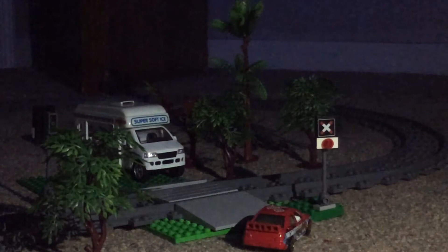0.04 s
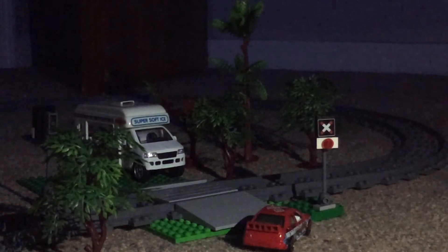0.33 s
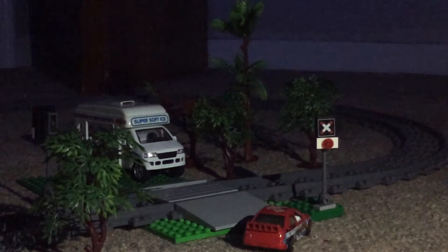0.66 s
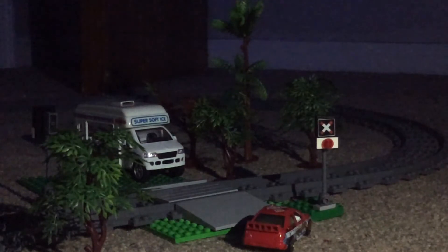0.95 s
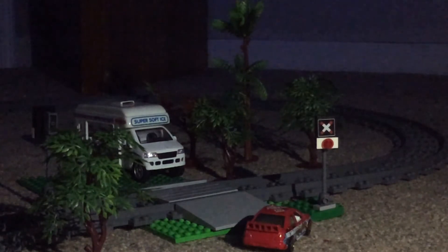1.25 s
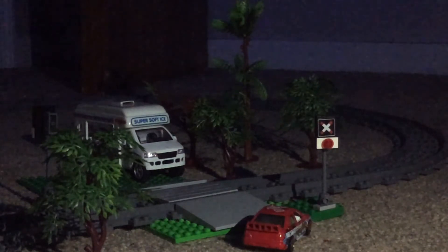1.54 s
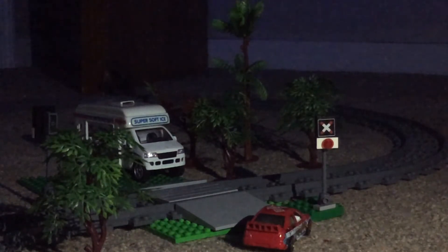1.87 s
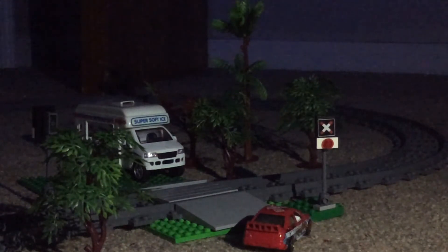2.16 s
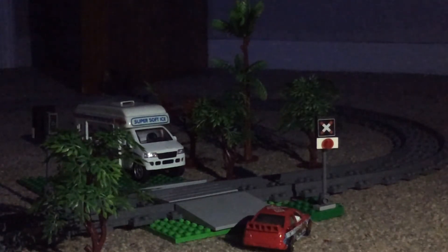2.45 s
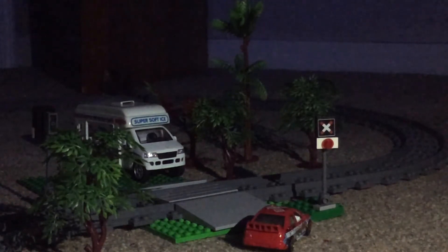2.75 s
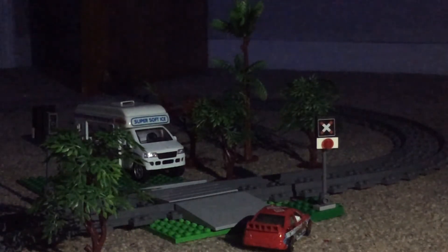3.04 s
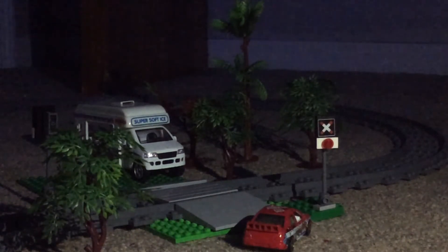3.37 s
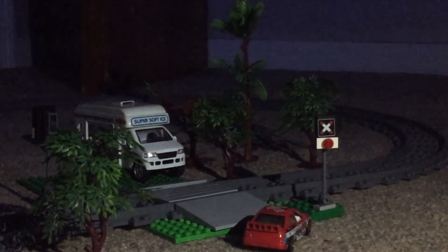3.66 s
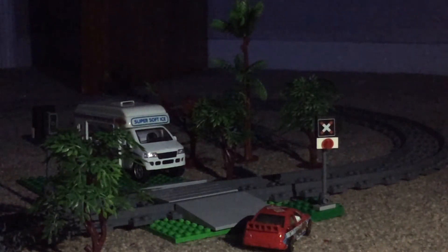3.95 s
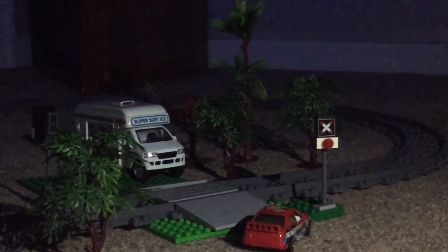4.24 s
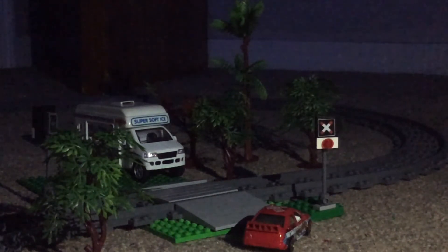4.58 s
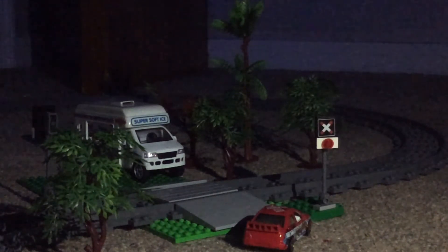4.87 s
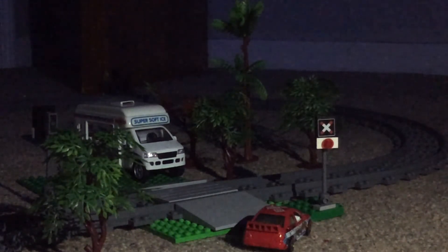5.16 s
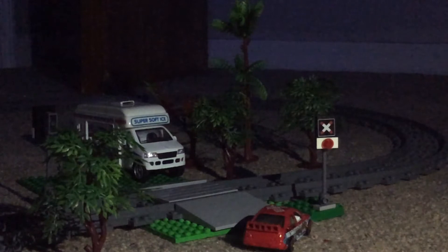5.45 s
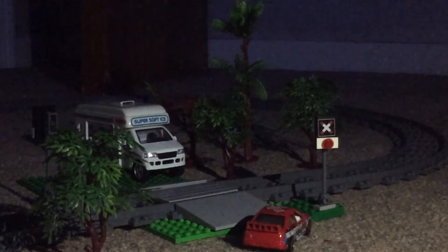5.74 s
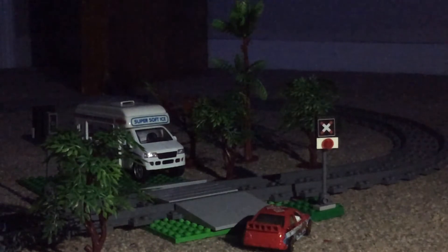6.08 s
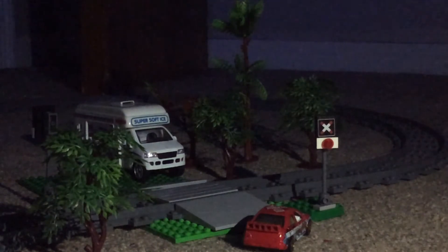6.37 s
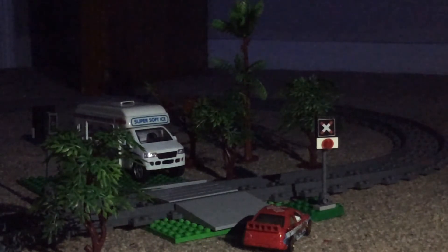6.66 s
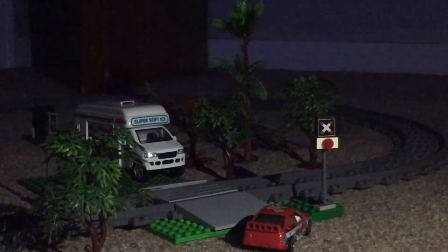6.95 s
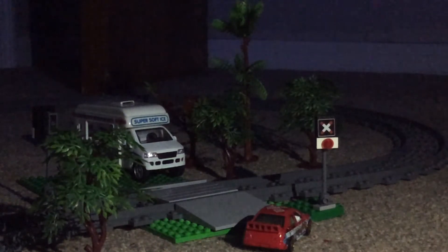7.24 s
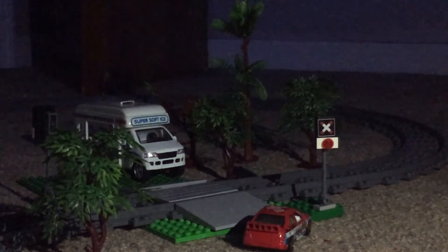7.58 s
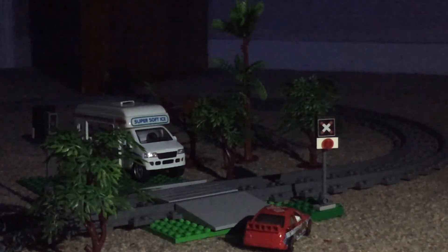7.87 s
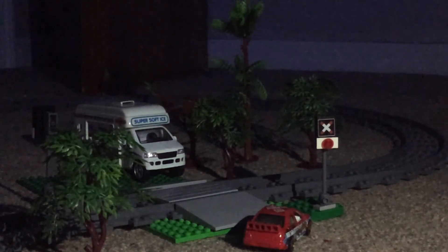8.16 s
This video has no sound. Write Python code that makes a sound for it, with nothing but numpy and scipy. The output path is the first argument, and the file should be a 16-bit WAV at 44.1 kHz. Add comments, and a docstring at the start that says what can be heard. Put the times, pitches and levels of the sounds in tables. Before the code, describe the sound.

A small model train whirrs faintly around its track in a quiet room, with a few dull clicks over steady hiss.

```python
"""A small model train circles its track in a quiet room: a thin whirr that comes nearer and recedes.
Its wheels and gears make friction noise, which flutters with each turn of the drive shaft.
At the start rubbed metal sings faintly in its modes, with a thin squeak; later a wheel scrapes a joint.
Dull clicks, as of fingers shifting on a camera body, are the damped vibration of a plastic shell.
Under it all lie steady room noise, microphone hiss and a weak mains hum."""
import sys
import numpy as np
from scipy import signal
from scipy.fft import rfft, irfft, next_fast_len
from scipy.io import wavfile
from scipy.ndimage import uniform_filter1d, map_coordinates

SR = 44100
rng = np.random.default_rng(int(sys.argv[2]) if len(sys.argv) > 2 else 0)


def int16_out(signal):
    """Quantize to a 16-bit WAV file."""
    q = np.round(np.clip(np.atleast_2d(signal).T, -1, 1) * 32767)
    wavfile.write(sys.argv[1], SR, q.astype(np.int16))


N = 362184
TIME = np.arange(N) / SR

# touches on the shell, crisper if the rise is short: (time [s], level [dB], pitch [Hz], rise time [s])
TOUCHES = [(4.5195, -30.5, 700, 0.00061), (4.524, -42, 600, 0.0013), (4.65, -47, 820, 0.0017),
           (4.664, -35.5, 764, 0.0019), (4.668, -31, 770, 0.0021), (4.6805, -34.5, 740, 0.0015),
           (4.721, -38, 705, 0.0011), (4.728, -33.5, 845, 0.0012), (4.73, -34, 554, 0.002),
           (4.7745, -24.5, 785, 0.0015), (4.867, -39, 790, 0.0017), (4.913, -35, 645, 0.0023),
           (4.9435, -28, 815, 0.00043), (5.428, -39, 620, 0.0015), (5.497, -35, 720, 0.00087),
           (5.7125, -31, 620, 0.0015), (5.73, -29, 641, 0.002), (5.7405, -30, 620, 0.0022),
           (5.7455, -33.5, 760, 0.0011), (5.752, -19, 734, 0.0012), (5.761, -36, 710, 0.002),
           (5.784, -39, 760, 0.001), (5.7915, -37, 680, 0.0012), (6.9595, -38.5, 960, 0.0015),
           (6.9645, -33.5, 880, 0.0015), (7.023, -34, 780, 0.0013), (7.027, -44, 800, 0.0013),
           (7.783, -37, 780, 0.0013)]


def amp(db):
    """Amplitude ratio of a level in decibels."""
    return 10 ** (np.asarray(db) / 20)


def unit(x):
    """Normalisation to rms 1."""
    return x / np.sqrt(np.mean(x ** 2) + 1e-20)


def curve(points):
    """Linear interpolation of (time [s], level [dB]) points at every sample."""
    return np.interp(TIME, *np.transpose(points))


def bell(x, centre, width):
    """Gaussian curve of height 1 and standard deviation width."""
    return np.exp(-.5 * ((x - centre) / width) ** 2)


def wobble(rate):
    """Smooth random modulation: a spline with rate knots a second."""
    return map_coordinates(rng.standard_normal(int(N * rate / SR) + 4), [TIME * rate])


def tone(hz):
    """A sine of rms 1 whose phase is the integral of its frequency."""
    return np.sqrt(2) * np.sin(2 * np.pi * (np.cumsum(hz) / SR + rng.random()))


def filtered(x, response):
    """Linear filtering: the spectrum of x times a frequency response."""
    size = next_fast_len(N + SR // 2)
    return irfft(rfft(x, size) * response(np.fft.rfftfreq(size, 1 / SR)), size)[:N]


def colour(x, points):
    """Spectral shaping by (frequency [Hz], gain [dB]) points on a log frequency axis."""
    knots_hz, db = np.transpose(points)
    return filtered(x, lambda hz: amp(np.interp(np.log(hz + 1), np.log(knots_hz), db)))


def noise(points):
    """White noise filtered to a spectrum, at rms 1."""
    return unit(colour(rng.standard_normal(N), points))


def patchy_noise(points, patchy_db, size=3):
    """Coloured noise of rms 1, randomly modulated in patches size bands wide and size frames long."""
    frames = signal.stft(rng.standard_normal(N), nperseg=2048)[2]
    patches = uniform_filter1d(rng.standard_normal(frames.shape), size, axis=0)
    patches = uniform_filter1d(patches, size, axis=1)
    modulated = signal.istft(frames * amp(patchy_db * np.tanh(unit(patches))))[1][:N]
    return unit(colour(modulated, points))


def train(shaft_hz=27.72, flutter_db=2.2, sheen_db=-27, emerge_at_s=1.23, emerge_for_s=0.95):
    """Amplitude modulation of friction noise: wheels and gears rub harder once in each shaft turn."""
    # spectra of the wheels and gears and of their faint top: (frequency [Hz], relative level [dB])
    whirr_spectrum = [(200, -33), (380, -26), (520, -9), (1200, -31), (1650, -21.5), (1790, -19.5),
                      (2020, -25), (2350, -7), (3250, -11), (3700, -16.5), (4400, -14), (5100, -3),
                      (5550, -3), (5850, 4.5), (6250, 3.5), (7100, -6), (7500, -2), (7850, -15.5),
                      (8100, -54.5)]
    sheen_spectrum = [(8400, -71), (9300, -11), (9600, -20.5), (10050, -2), (10600, -13), (11100, -11),
                      (11700, -63)]
    # shading of the treble until the train has come round: (frequency [Hz], gain [dB])
    treble_shade = [(5900, 0), (6600, -5), (7200, -5), (8000, -2.5)]
    # the train approaches, stays near and slowly recedes: (time [s], level [dB])
    pass_level = [(0, -53.5), (0.35, -52), (0.8, -54), (1.3, -53), (1.8, -49.5), (2.3, -46.5), (2.7, -45),
                  (3.6, -46), (4.5, -48), (5.1, -49), (5.9, -51), (6.7, -52), (7.8, -53), (8.1, -52)]
    turns = np.cumsum(shaft_hz * (1 + 0.015 * wobble(1.513))) / SR
    once_a_turn = (.5 + .5 * np.cos(2 * np.pi * turns)) ** 9
    rub = once_a_turn * (1 + .9 * wobble(25))
    flutter = unit(amp(flutter_db * rub + 0.13 * wobble(11)))
    whirr = patchy_noise(whirr_spectrum, patchy_db=4.0)
    emerged = np.clip((TIME - emerge_at_s) / emerge_for_s, 0, 1)
    whirr = emerged * whirr + (1 - emerged) * colour(whirr, treble_shade)
    sheen = amp(sheen_db) * noise(sheen_spectrum)
    return amp(curve(pass_level)) * flutter * (whirr + sheen)


def room(waver_db=0.77, hiss_db=-63):
    """The noise floor: a superposition of hollow room noise, mains hum and microphone hiss."""
    # spectra of the room noise and of the hiss: (frequency [Hz], relative level [dB])
    air_spectrum = [(20, -56), (45, -30.5), (80, -19.5), (200, -25), (320, -31.5), (410, -19.5), (520, -6),
                    (603, 0.35), (645, -2.5), (700, 0.5), (758, 2.3), (790, -1), (845, 3.5), (905, -2.5),
                    (965, -5.5), (1040, -3), (1085, -5.5), (1135, -5.5), (1240, -11.5), (1310, -13),
                    (1420, -22), (2600, -61)]
    hiss_spectrum = [(20, -8), (200, -5), (1700, -2.5), (2600, 4), (4000, -1.5), (7000, 2.5), (8300, -53),
                     (12000, -23), (14600, -16.5), (15700, -20)]
    # slow drift of the room noise: (time [s], level [dB])
    air_level = [(0, -51.8), (2.5, -51.7), (4.7, -51.5), (5.4, -53.5), (6.1, -54), (6.8, -52.5),
                 (8.2, -52.5)]
    # mains fundamental and second harmonic: (frequency [Hz], rms level [dB])
    hum_partials = [(60, -83), (120, -78.5)]
    air = amp(curve(air_level) + waver_db * wobble(16)) * patchy_noise(air_spectrum, patchy_db=1.5)
    hum = sum(amp(db) * tone(hz + 0.26 * wobble(3.6)) for hz, db in hum_partials)
    return air + hum + amp(hiss_db) * noise(hiss_spectrum)


def singing_metal(beat_hz=5.9, beat_crest_s=0.05, waver_db=0.3):
    """Modal vibration of rubbed metal: each mode holds, swells or beats, then decays exponentially."""
    # modes of the metal: (frequency [Hz], level at release [dB], release time [s],
    # swell until release [dB/s], t60 [s], beat depth [dB])
    modes = [(604, -62, 0.17, 0, 0.7, 0), (1383, -58.7, 0.225, 60, 0.25, 0), (1868, -77.5, 0.42, 0, 0.4, 0),
             (2383, -61.7, 0.25, -10, 0.8, 2.8), (2935, -64.7, 0.22, 0, 0.25, 1),
             (3517, -73, 0.24, 0, 0.3, 0)]
    singing = np.zeros(N)
    for hz, db, release_s, swell, t60, beat_db in modes:
        slope = np.where(TIME < release_s, swell, -60 / t60)
        beat = np.cos(2 * np.pi * beat_hz * (np.minimum(TIME, release_s) - beat_crest_s))
        level_db = db + slope * (TIME - release_s) + beat_db * beat - waver_db * wobble(20)
        singing += amp(level_db) * tone(hz * (1 + 0.0017 * wobble(30)))
    return singing


def squeak(rest_hz=1018, top_hz=1310, top_s=0.18, loudest_s=0.48, level_db=-62, jitter=0.006):
    """Frequency modulation: a thin, unsteady tone arches in pitch and is loudest on the way down."""
    hz = rest_hz + (top_hz - rest_hz) * bell(TIME, top_s, width=0.16)
    swell = bell(TIME, loudest_s, width=np.where(TIME < loudest_s, 0.26, 0.062))  # slow rise, quick fall
    return amp(level_db) * swell * tone(hz * (1 + jitter * wobble(66.0)))


def rail_joint():
    """Sliding friction: a wheel scrapes over a rail joint in a short burst of broadband noise."""
    # the wheel's crossing: (time [s], level [dB], Gaussian width [s])
    crossings = [(1.659, -46.5, 0.0077)]
    # spectrum of the scrape: (frequency [Hz], relative level [dB])
    scrape_spectrum = [(300, -50), (1200, -18), (2000, -3), (2900, 4), (3600, -3), (4400, -11), (5200, -3),
                       (6000, 10), (7600, -12), (8400, -50)]
    stroke = sum(amp(db) * bell(TIME, at_s, width) for at_s, db, width in crossings)
    return stroke * noise(scrape_spectrum)


def creaks(count=3, relative_db=-23.5, spread_s=0.018, scatter_db=6.5, detune=0.061):
    """The shell creaks in weak ticks, normally distributed round each touch; rows as in TOUCHES."""
    chance = rng.standard_normal((len(TOUCHES), count, 3))
    return [(at_s + spread_s * late, db + relative_db + scatter_db * loud, hz * np.exp(detune * high), rise)
            for (at_s, db, hz, rise), ticks in zip(TOUCHES, chance)
            for late, loud, high in ticks]


def clicks(click_db=-1.0, build_up_s=0.0022, scuff_db=-27, scuff_decay_s=0.021):
    """Damped oscillation: each touch swings a plastic shell for a few cycles, amid a fingertip's scuff."""
    # modes that ring on briefly: (frequency [Hz], relative level [dB], t60 [s])
    shell_modes = [(607, -18, 0.055), (794, -40, 0.039), (1070, -21, 0.036), (1236, -19, 0.037)]
    # the shell's response to a touch: (frequency [Hz], gain [dB])
    shell_response = [(150, -39), (280, -27), (420, -5.5), (800, 2.5), (1250, 0.5), (1500, -26),
                      (2200, -23), (4000, -61)]
    # friction noise of a fingertip on the shell: (frequency [Hz], relative level [dB])
    scuff_spectrum = [(150, -36), (280, -21), (400, -5.5), (650, 9), (1150, 2), (1450, -15), (2200, -26),
                      (4000, -67)]
    knocks, scuff_envelope = np.zeros(N), np.zeros(N)
    t = np.arange(SR // 16) / SR
    for at_s, db, hz, rise in [*TOUCHES, *creaks()]:
        pulse = (t / rise * np.exp(1 - t / rise)) ** 2
        swing = pulse * np.cos(2 * np.pi * hz * (t - rise))
        ring = sum(amp(mode_db - 60 * t / t60) * np.cos(2 * np.pi * mode_hz * (t - rise))
                   for mode_hz, mode_db, t60 in shell_modes)
        ring *= 1 - np.exp(-t / rise)
        start = round((at_s + build_up_s - rise) * SR)  # the swing peaks build_up_s after the touch
        knocks[start:][:len(t)] += amp(db + click_db) * (swing + ring)
    for at_s, db, _, _ in TOUCHES:
        scuff_envelope += amp(db + scuff_db) * np.exp(-np.abs(TIME - at_s - build_up_s) / scuff_decay_s)
    return colour(knocks, shell_response) + scuff_envelope * noise(scuff_spectrum)


def scene():
    """Superposition of all sources at one microphone."""
    return (train() + rail_joint() + singing_metal() + squeak() + clicks() + room())[None]


def record(dry, notch_hz=5360, notch_width_hz=50, notch_db=-13, top_hz=15700):
    """The microphone's frequency response: one narrow notch and an upper band limit."""
    notch = lambda hz: amp(notch_db * bell(hz, notch_hz, notch_width_hz))
    return filtered(dry[0], lambda hz: notch(hz) * (hz < top_hz))[None]


dry = scene()
out = record(dry)
int16_out(out)
```